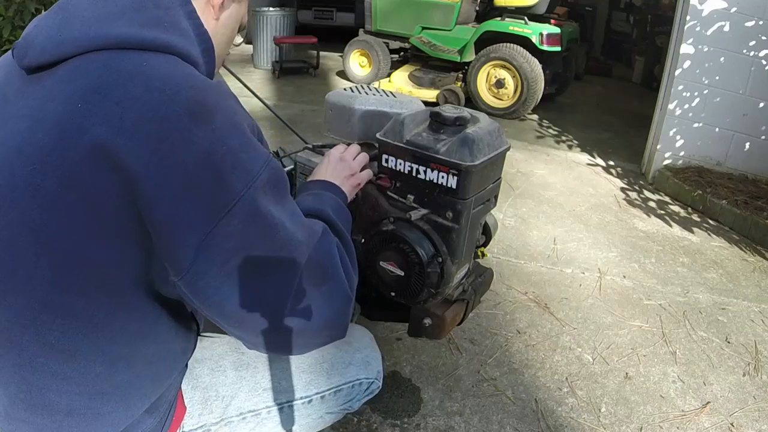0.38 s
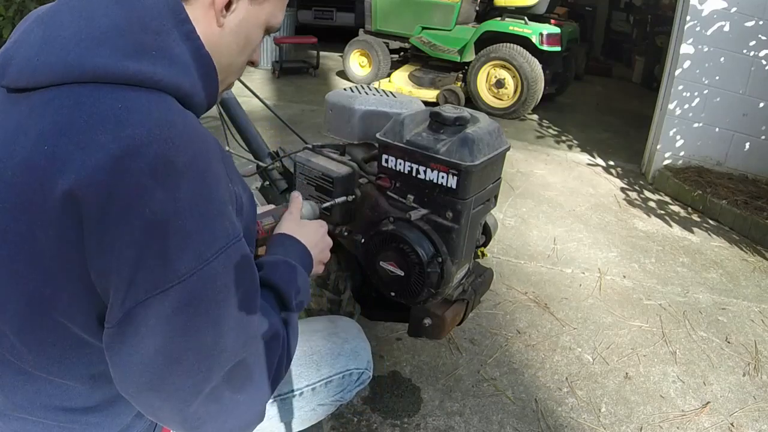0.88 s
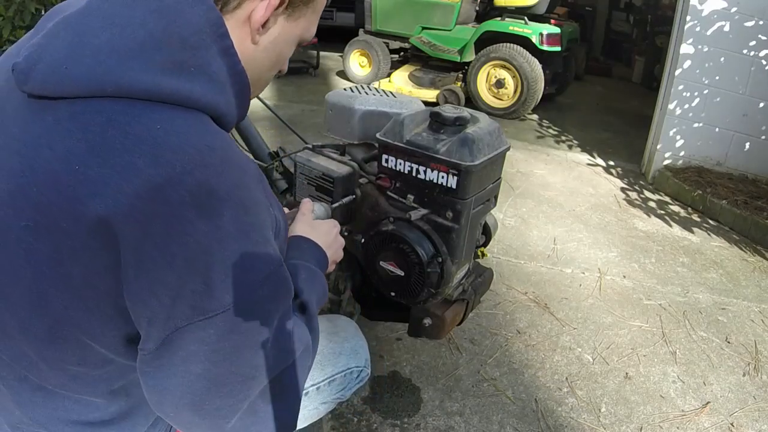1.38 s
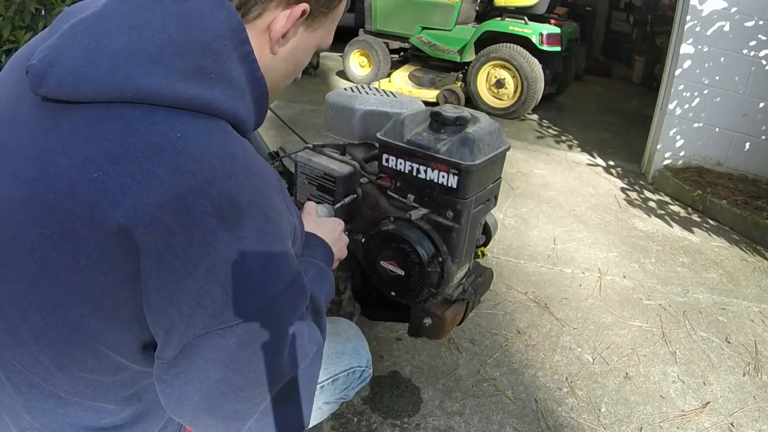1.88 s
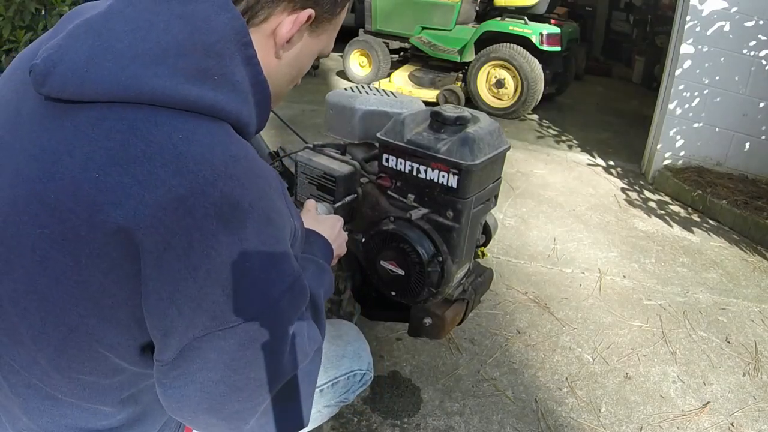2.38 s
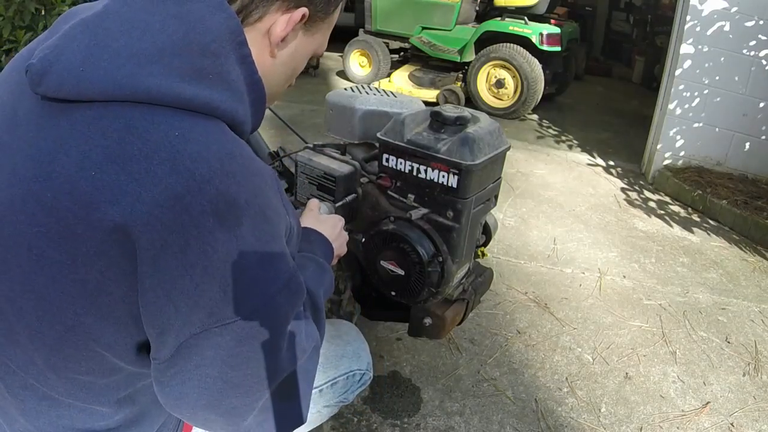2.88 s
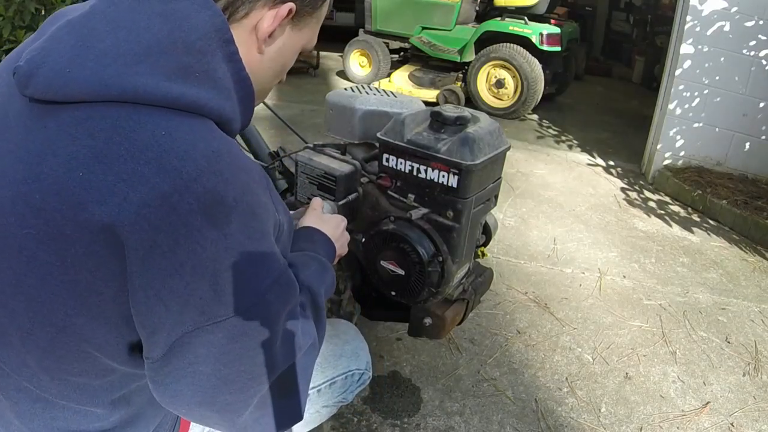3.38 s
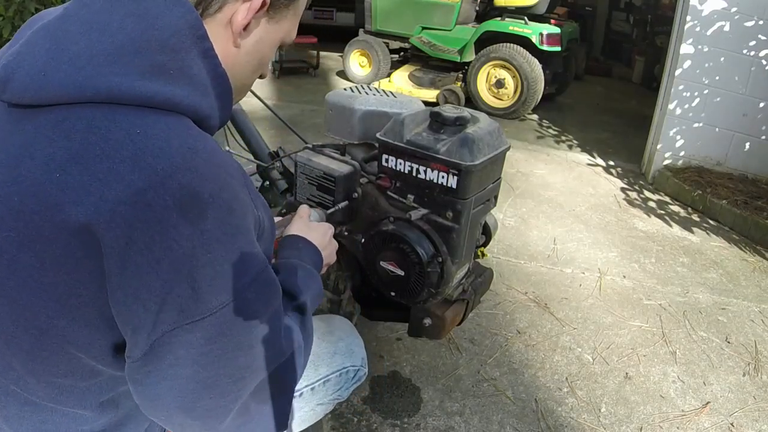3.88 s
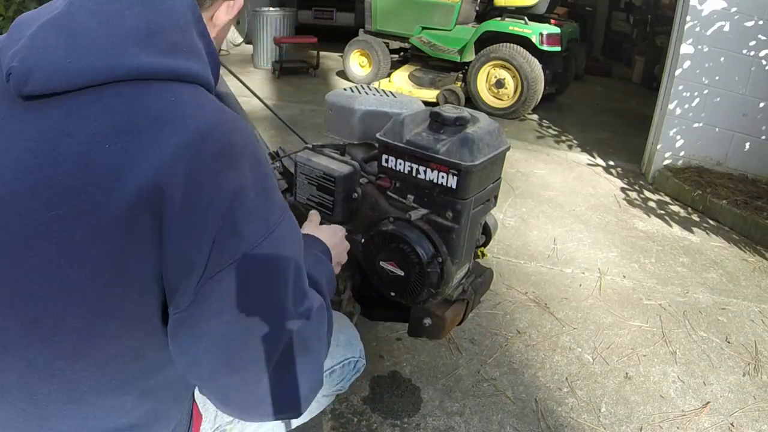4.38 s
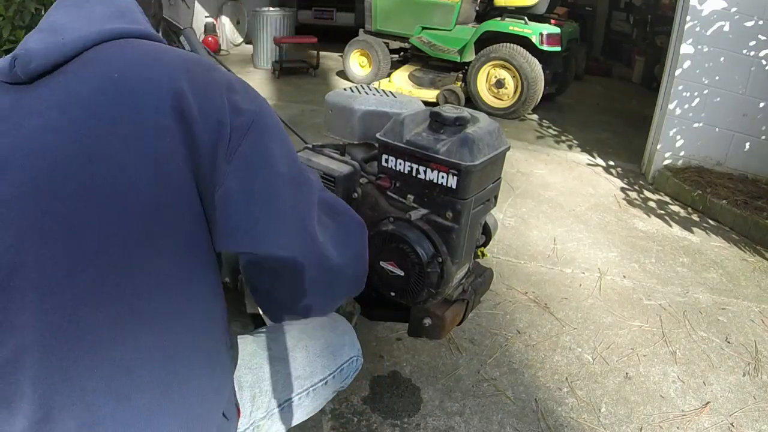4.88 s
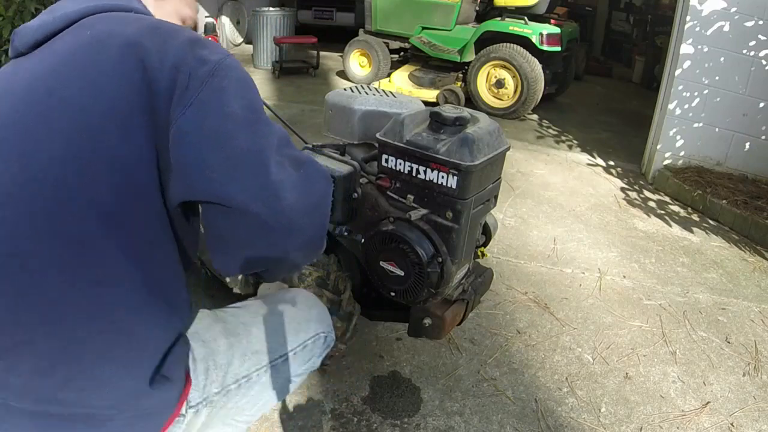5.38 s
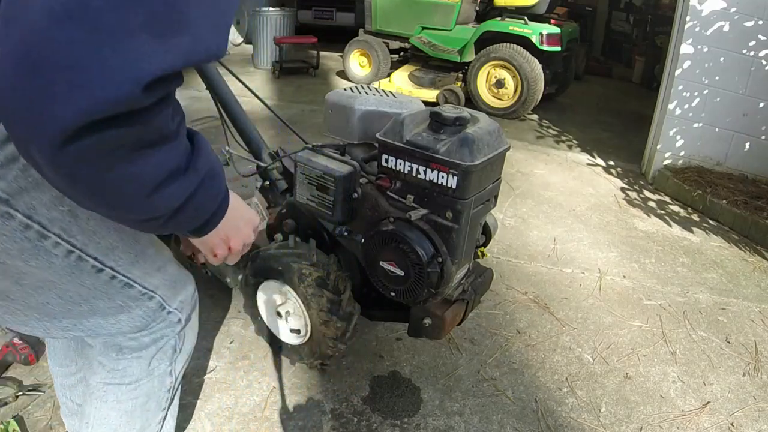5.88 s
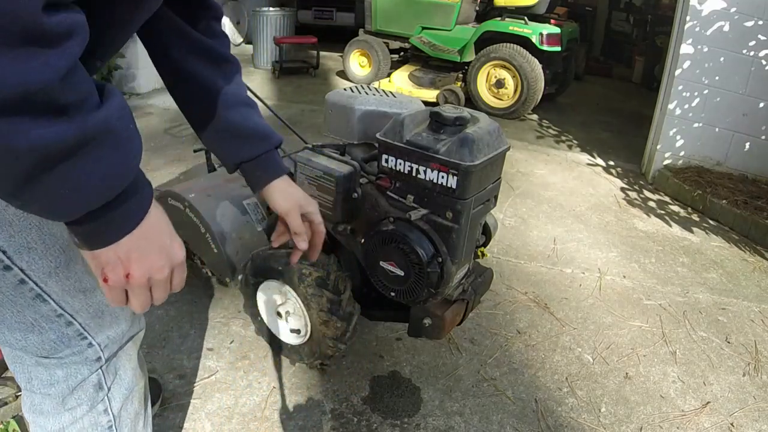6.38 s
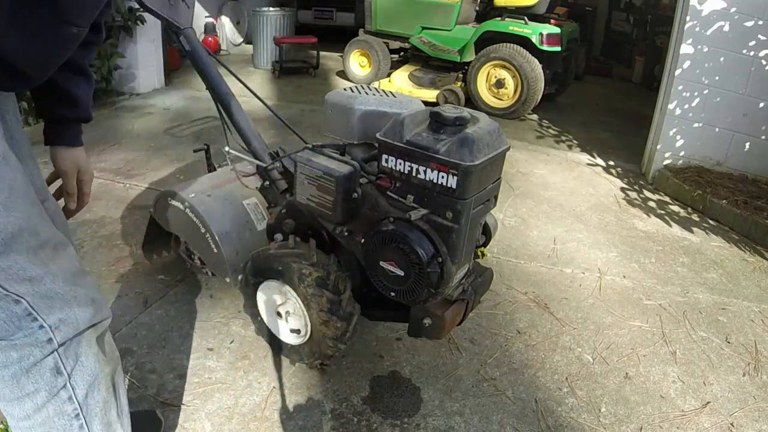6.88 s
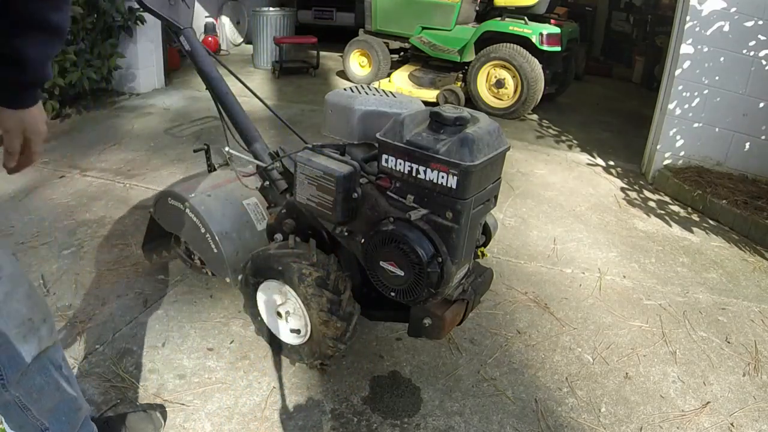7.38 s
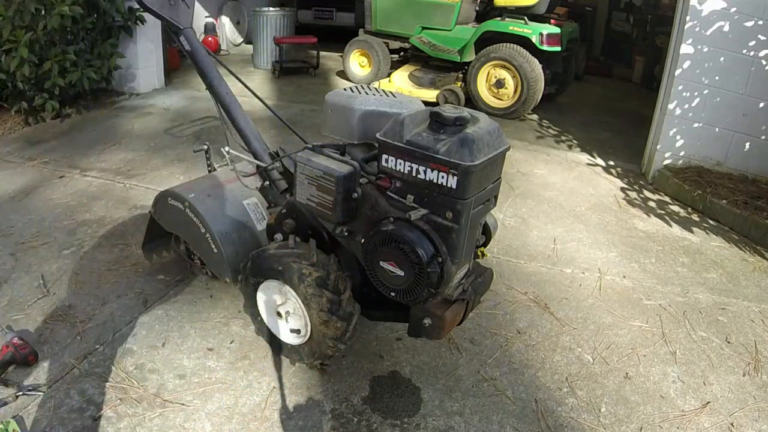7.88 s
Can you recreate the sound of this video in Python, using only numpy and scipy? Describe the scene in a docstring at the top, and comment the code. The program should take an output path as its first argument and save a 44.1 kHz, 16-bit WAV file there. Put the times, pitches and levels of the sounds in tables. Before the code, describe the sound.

Close outdoor sound of power-tool work on an engine: a brief rattling hammer burst right at the start, scattered light taps of the bit, then a whining motor run ending in a louder, fast metallic burst. Afterwards it is quiet, with a faint clothing crackle, a clack as the tool is put down, small snaps and hissing scrapes. Thin bird calls and low traffic rumble surround it, with a short echo from nearby walls.

```python
"""In a yard before a barn door, a cordless impact driver tightens two screws on a small engine's cover.
Its motor whirs as gear noise and shaft harmonics; hammer blows and rebounds in pairs, and knocks of the bit,
crack as noise and ring the cover's modes. Set down, the tool snaps and rings its resonances.
Narrow bands of noise hiss as scrapes and stiff cloth ticks; the barn's walls answer in decaying noise.
Birds call as gliding tones over a far rumble of coloured noise with a faint whine."""
import sys
import numpy as np
from scipy import signal
from scipy.fft import rfft, irfft, next_fast_len
from scipy.io import wavfile
from scipy.ndimage import uniform_filter1d, map_coordinates

SR = 44100
rng = np.random.default_rng(int(sys.argv[2]) if len(sys.argv) > 2 else 0)


def invert_db(level):
    """Linear amplitude ratio for a level in decibels (20 dB per decade), elementwise."""
    return 10 ** (np.asarray(level, dtype=float) / 20)


def inscribe(sig):
    """Save sig as 16-bit PCM at rate SR to the path in sys.argv[1].

    A 1-D sig is mono; a 2-D sig holds one channel per row.
    Samples are clipped to [-1, 1] before scaling.
    """
    pcm = np.round(np.clip(np.atleast_2d(sig).T, -1, 1) * 32767)
    wavfile.write(sys.argv[1], SR, pcm.astype(np.int16))


N = 363825
TIME = np.arange(N) / SR

# Modes of the cover. Each row: frequency in Hz, 60 dB decay time in seconds, then relative level in dB
# at the first screw, at the second screw and under the loose bit.
COVER = [(121.3, 0.062, -7.5, -17.5, -2), (250, 0.071, -10.5, -0.5, -6), (275.4, 0.18, -27, -7, -13),
         (371, 0.089, 3.5, 1, 3.5), (436, 0.073, -1.5, -7, 6), (549.6, 0.042, -0.5, -2.5, -4),
         (662.4, 0.4, -17.5, -25, -21.5), (802.6, 0.33, -14, -25, -22), (944, 0.033, -4.5, -14, 3.5),
         (1084, 0.075, -5, -11.5, -10.5), (1394, 0.026, -11.5, -14, 5.5)]


def unit(x):
    """Normalisation: scales a signal to an rms of 1."""
    return x / np.sqrt(np.mean(x ** 2) + 1e-20)


def along(points, hz):
    """Interpolation on a logarithmic frequency axis, through (Hz, value) points."""
    point_hz, values = np.transpose(points)
    return np.interp(np.log(hz + 1), np.log(point_hz + 1), values)


def curves(rows):
    """Linear interpolation in time: one curve per column after the first, then a soft gate shut outside the rows."""
    s, *columns = np.transpose(rows)
    is_open = 1. * ((TIME >= s[0]) & (TIME <= s[-1]))
    gate = uniform_filter1d(is_open, size=300, mode="nearest")
    return [np.interp(TIME, s, column) for column in columns] + [gate]


def wobble(rate):
    """Slow random modulation: a smooth curve through `rate` random knots a second."""
    knots = rng.standard_normal(int(N * rate / SR) + 4)
    return map_coordinates(knots, [TIME * rate])


def filtered(x, response):
    """Linear filtering: multiplies the spectrum by a response of frequency."""
    size = next_fast_len(len(x) + 8192)
    spectrum = rfft(x, size) * response(np.fft.rfftfreq(size, 1 / SR))
    return irfft(spectrum, size)[:len(x)]


def noise(response):
    """Coloured noise: white noise shaped by a response, at an rms of 1."""
    return unit(filtered(rng.standard_normal(N), response))


def even(x):
    """Envelope flattening: irons out the chance swells of noise, so that like blows crack alike."""
    return x / np.sqrt(np.abs(uniform_filter1d(x ** 2, size=130)) + 1e-6)


def resonances(peaks):
    """Modal superposition: sums (Hz, width in Hz, dB) resonances, neighbours in opposite sign."""
    def response(f):
        total = 0
        for k, (centre, width, db) in enumerate(peaks):
            damping = 1j * f * width
            total = total + (-1) ** k * invert_db(db) * damping / (centre * centre - f * f + damping)
        return total
    return response


def tone(hz, rough_hz):
    """Frequency modulation: the phase is the integral of a fluttering pitch."""
    return 2 * np.pi * np.cumsum(hz + rough_hz * wobble(60)) / SR


def shaking(place):
    """Forced vibration: steady noise excites the cover's modes, as heard from one place on it."""
    modes = resonances([(row[0], 4.1 / row[1] + 8, row[2 + place]) for row in COVER])
    top_hz = 1800  # the shaking fades above this
    return noise(lambda f: modes(f) / (1 + (f / top_hz) ** 4))


def tool(low_db, high_db, spread_db):
    """Body resonance: modes of the tool and loose parts, randomly varied and tipped towards low or high."""
    # Each row: frequency in Hz, width in Hz, level in dB before the random spread.
    body_modes = [(220, 240, 1.5), (484, 210, 6.5), (950, 290, 7), (1354, 290, 8.5), (1960, 320, -1),
                  (2516, 280, 2.5), (3200, 520, 0), (5110, 490, 3.5), (5940, 830, 2.5), (9100, 3500, -9.5)]
    rings = resonances([(hz, width, db + rng.normal(0, spread_db)) for hz, width, db in body_modes])
    tilt = [(1450, low_db), (1900, 0), (4000, 0), (4800, high_db)]
    return lambda f: rings(f) * invert_db(along(tilt, f))


def hammer():
    """Impact excitation: blows, rebounds and knocks ring the cover's modes, with a crack and a loose rattle."""
    # Hammer strokes. Each row: time in seconds, strength in dB.
    blows = [(0.1272, -14), (.1645, -13), (.2, -13), (0.2377, -13.5), (0.2786, -14.5), (3.4883, -9),
             (3.5259, -6.5), (3.5609, -7.5), (3.5926, -8), (3.6252, -6), (3.6607, -9)]
    # Lighter knocks of the bit on the cover. Each row: time in seconds, crack strength in dB,
    # thump in dB relative to the crack.
    knocks = [(0.1198, -29.5, 5), (1.0115, -30, -10.5), (1.056, -32, -5), (1.086, -53, 9.5),
              (1.0934, -33.5, -5), (1.2128, -53.5, 10), (1.379, -34, -9), (1.3875, -23.5, -16),
              (1.4785, -38.5, -4), (1.5736, -29, -6.5), (2.2753, -28.5, -28), (3.0091, -37.5, 5.5),
              (3.0454, -32.5, 4.5), (3.48, -18.5, -7.5), (3.6819, -20.5, -3.5), (3.7064, -38, 17)]
    # Each screw's seat. Each row: first flight to the rebound in seconds, then levels in dB against the
    # stroke's strength: the blow's crack, the blow's thump, dragging steel, the cover shaken by the dragging.
    seats = [(.0092, -3.5, -7, -21.5, -12.5), (0.00728, 0, -5.5, -28.5, -18)]
    # Steel on steel. Each row: frequency in Hz, relative noise density in dB.
    anvil = [(470, -35.5), (800, -3.5), (1080, -7), (3020, -3.5), (4290, -15.5), (6740, -7), (7930, -22.5),
             (8990, -14.5), (15500, -28.5)]
    rebound_thump_db = -14  # the rebound is mostly crack
    flight_shrinks = .96  # each flight over the one before, as the screw tightens
    cock_s, cock_db = 0.00643, -15.5  # the hammer ticks over its cam just before a blow
    drag_lead_s, drag_lag_s = 0.0034, 0.037  # the hammer drags from before the first blow to after the last
    soft_db_per_octave = .5  # a duller knock reaches the upper modes less: loss for each dB of thump
    low_cut_hz = 205  # low cut on the ring of all but the lowest mode

    hits, drag, rumble = list(knocks), 0, 0
    for screw, (flight, crack_db, thump_db, drag_db, shake_db) in enumerate(seats):
        strokes = [row for row in blows if (row[0] > 1) == screw]
        hits += [(s, db + crack_db, thump_db - crack_db) for s, db in strokes]
        hits += [(s - cock_s, db + cock_db, rebound_thump_db) for s, db in strokes[1:]]
        hits += [(s + flight * flight_shrinks ** k, db, rebound_thump_db)
                 for k, (s, db) in enumerate(strokes)]
        gate, = curves([(strokes[0][0] - drag_lead_s,), (strokes[-1][0] + drag_lag_s,)])
        effort = gate * invert_db(np.mean(strokes, axis=0)[1])
        drag = drag + effort * invert_db(drag_db + 3.6 * wobble(200))
        rumble = rumble + effort * invert_db(shake_db) * shaking(screw)

    lowest, ring, steel_burst, dull_burst = np.zeros((4, N + SR))
    t = np.arange(SR // 2) / SR
    hz, t60, *levels = np.transpose(COVER)[:, :, None]
    sides = (-1) ** np.arange(len(COVER))[:, None]  # neighbouring modes start in opposite directions
    ring_rise = 1 - np.exp(-t / 0.0011)
    crack = invert_db(-60 * t / 0.012)
    rattle = invert_db(-11.0 - 60 * t / 0.047)
    crack_shape = (1 - np.exp(-t / 0.00035)) * (crack + rattle)
    for s, db, thump_db in hits:
        place = 0 if s < 1 else 1 if 2.5 < s < 4 else 2  # first screw, second screw, loose bit
        loose = place == 2
        octaves_up = np.log2(np.maximum(hz / 450, 1))
        soft_db = loose * soft_db_per_octave * max(thump_db + 8, 0) * octaves_up
        mode_db = levels[place] - soft_db + rng.normal(0, 3.33, hz.shape)
        sizes = sides * invert_db(mode_db - 60 * t / t60) * ring_rise
        waves = invert_db(db + thump_db) * sizes * np.sin(2 * np.pi * hz * t)
        span = slice(round(s * SR), round(s * SR) + len(t))
        lowest[span] += waves[0]
        ring[span] += waves[1:].sum(0)
        burst = dull_burst if loose else steel_burst
        burst[span] += invert_db(db - 6.5) * crack_shape

    steel = even(noise(lambda f: invert_db(along(anvil, f))))
    dull = even(noise(tool(low_db=-7.5, high_db=-12.5, spread_db=0)))  # a loose bit sets off the tool's body
    upper = filtered(ring[:N] + rumble, lambda f: f ** 8 / (f ** 8 + low_cut_hz ** 8))
    cracks = (steel_burst[:N] + drag) * steel + dull_burst[:N] * dull
    return lowest[:N] + upper + cracks


def motor():
    """Rotating machinery: shaft speed sets harmonics and gear whine, effort their levels; the speed control sings."""
    # Two runs of the motor. Each row: time in seconds, shaft rate in Hz, effort in dB.
    runs = [
        [(0, 250, -58.5), (.12, 255, -57)],
        [(2.27, 160, -65), (2.38, 191, -61.5), (2.52, 228, -58.5), (2.6, 245, -62.5), (2.7, 205, -67),
         (2.77, 212, -58), (2.83, 218, -57), (2.97, 250, -55.5), (3.48, 257, -55.5)],
    ]
    # Shaft orders. Each row: multiple of the shaft rate, relative level in dB.
    shaft_orders = [(2, -3), (3, 3), (4, -8), (14.5, -12.5)]
    # Colour of the gear noise as heard. Each row: frequency in Hz, relative noise density in dB.
    gear_noise = [(530, -6.5), (900, -1.5), (2700, -8), (3000, -1), (3250, -8), (3800, -15), (4330, -22.5),
                  (5370, -14), (7860, -27.5), (9290, -25), (11500, -32), (13000, -25.5), (15500, -48.5)]
    # Speed-control tone while the trigger is held. Each row: start in seconds, end in seconds, level in dB.
    trigger = [(2.27, 2.57, -60.5), (2.65, 3.47, -63.5)]
    # Its harmonics. Each row: multiple of the tone, relative level in dB.
    switch_orders = [(1, 0), (2, -8), (3, -7), (5, -15)]
    switch_hz = 1840
    full_effort_db = -55
    orders_over_db, orders_grow = 8.5, 2.0  # over the effort; further gain for each dB of effort
    brightens, bright_hz = 0.88, 6000  # gear treble gained for each dB of effort, above this
    mesh_teeth, mesh_under_db = 21.8, -14  # gear whine: multiple of the shaft, level against the effort
    loose_db, seated_s, seated_db = 6.5, 2.94, 10  # the cover shakes more once the bit has seated
    jolt_s, jolt_width_s, jolt_db = 3.055, 0.063, 9.5  # the bit judders as the thread bites

    gears = noise(lambda f: invert_db(along(gear_noise, f)))
    treble = filtered(gears, lambda f: 1 / (1 + (bright_hz / (f + 1)) ** 4))
    jolt = np.exp(-((TIME - jolt_s) / jolt_width_s) ** 2)
    contact_db = np.where(TIME > seated_s, seated_db, loose_db) + jolt_db * jolt
    shake = invert_db(uniform_filter1d(contact_db, size=900) + 2.1 * wobble(35)) * shaking(1)
    out = np.zeros(N)
    for rows in runs:
        hz, db, gate = curves(rows)
        extra_db = db - full_effort_db
        whine = invert_db(mesh_under_db + 3 * wobble(41)) * np.sin(tone(mesh_teeth * hz, rough_hz=40))
        turn = tone(hz, rough_hz=1.5)
        orders = sum(invert_db(level + 2 * wobble(13)) * np.sin(k * turn) for k, level in shaft_orders)
        orders = invert_db(orders_over_db + orders_grow * extra_db) * orders
        bright_gears = gears + (invert_db(brightens * extra_db + 5.0) - 1) * treble
        grind = invert_db(8.5 + 1.3 * wobble(90)) * bright_gears
        out += gate * invert_db(db) * (grind + shake + whine + orders)
    beat = tone(switch_hz, rough_hz=1.6)
    held = sum(invert_db(db) * curves([(on,), (off,)])[0] for on, off, db in trigger)
    song = sum(invert_db(level + 2.6 * wobble(25)) * np.sin(k * beat) for k, level in switch_orders)
    return out + held * song


def clicks():
    """Transient excitation: snaps with settling grit ring the tool and loose parts, each in its own balance."""
    # Small clicks, snaps and grit. Each row: time in seconds, level in dB before the balance,
    # balance in dB of the low end (below about 1.8 kHz) and of the high end (above about 5 kHz).
    snaps = [(5.274, -31, -2, -13.5), (5.309, -41.5, 2, -8), (6.786, -34, -5.5, -10), (7.378, -55, 8, -8),
             (5.393, -43, 0.5, -14), (5.2598, -17, -3.5, -16), (5.2812, -23.5, -12, -16),
             (5.4495, -41, -1.5, -4.5), (5.5216, -44.5, -8, -7), (5.5728, -48.5, -15, -9),
             (5.8484, -43.5, -22, -4.5), (6.449, -48.5, 10.5, -34), (6.707, -27, -4.5, -7.5),
             (6.779, -32.5, -3.5, -9), (7.2662, -45.5, -6, -6), (7.4124, -42, -20, -18),
             (7.46, -42.5, -10, -13),  (7.5372, -33, -16, -24)]
    out, t = np.zeros(N + SR), np.arange(SR // 4) / SR
    for s, db, low_db, high_db in snaps:
        snap = invert_db(-60 * t / 0.014)
        grit = invert_db(-15 - 60 * t / 0.14 + 4.9 * wobble(153)[:len(t)])
        source = (snap + grit) * rng.standard_normal(len(t))
        puff = filtered(source, tool(low_db, high_db, spread_db=2))
        size = np.sqrt(1 + invert_db(2 * low_db) + invert_db(2 * high_db))
        out[round(s * SR):][:len(t)] += invert_db(db + 2.5) * size * puff / np.abs(puff).max()
    return out[:N]


def scrapes():
    """Sliding band noise: narrow hissing scrapes, the first after the tool is set down, fainter and lower at their ends."""
    # Each row: start, loudest moment and end in seconds, then centre in Hz and level in dB when loudest.
    hisses = [(5.285, 5.3, 5.6, 2950, -59.5), (6.998, 7.537, 7.68, 3270, -58.5),
              (8.044, 8.238, 8.4, 3830, -63)]
    edge_db, slide = -12, 0.14  # level change and share of the centre frequency lost at the ends
    centres = np.array([2600, 3100, 3600, 4100])  # Hz
    bands = np.array([noise(resonances([(c, 350, 0)])) for c in centres])
    out = np.zeros(N)
    for start, loudest, end, hz, db in hisses:
        edge, gate = curves([(start, 1), (loudest, 0), (end, 1)])
        centre_hz = hz * (1 - slide * edge)
        share = np.exp(-((centre_hz - centres[:, None]) / 400) ** 2)
        level = invert_db(db + edge_db * edge + 2.1 * wobble(150))
        out += gate * level * (share * bands).sum(0)
    return out


def rustle():
    """Sparse random impulses: stiff cloth crackles in scattered tiny ticks, mostly treble."""
    # Each row: start in seconds, end in seconds, level of the faintest ticks in dB.
    crackles = [(4.186, 4.66, -63.5)]
    ticks = np.zeros(N)
    for start, end, db in crackles:
        when, size = rng.random((14, 2)).T
        ticks[((start + when * (end - start)) * SR).astype(int)] = invert_db(db + 10 * size)
    envelope = signal.fftconvolve(ticks, invert_db(-60 * TIME[:2000] / 0.027))[:N]
    return envelope * noise(lambda f: np.exp(-np.log((f + 1) / 6500) ** 2 / 0.34))


def barn(x):
    """Reverberation: the walls' answer is noise in which each frequency dies at its own speed."""
    # Each row: frequency in Hz, 60 dB decay time in seconds.
    decay = [(400, 0.48), (800, 0.58), (3000, 0.43), (12000, 0.16)]
    hz, t, z = signal.stft(rng.standard_normal(SR), SR, nperseg=256)
    fade = invert_db(-60 * t / along(decay, hz)[:, None])
    tail = signal.istft(z * fade, SR, nperseg=256)[1]
    delayed = np.pad(x, (600, 0))  # samples
    return signal.fftconvolve(delayed, tail / np.linalg.norm(tail))[:N]


def birds():
    """Gliding near-pure tones: a thin high call and a lower warble, both with fluttering pitch and level."""
    # Shape of the high call. Each row: time from its start in seconds, pitch in Hz, relative level in dB.
    high_call = [(0, 9200, -8), (.012, 8100, -9), (.05, 7720, 0), (.127, 7750, -6), (.132, 7800, -30),
                 (.165, 9800, -30), (.17, 9300, -1), (.186, 7200, -2)]
    # The high bird. Each row: start in seconds, level in dB.
    high_bird = [(.82, -71), (4.092, -69.5), (5.487, -68)]
    # The low bird. Each row: start in seconds, length in seconds, pitch at the start in Hz, mid-note level in dB.
    low_bird = [(5.91, .21, 2780, -68), (6.96, .1, 2530, -57), (7.23, .065, 2440, -62),
                (7.305, .1, 2380, -65)]
    note_arch, note_swell_db = .035, 6  # each note arches, sags and swells towards its middle
    out = np.zeros(N)
    for start, call_db in high_bird:
        hz, db, gate = curves(np.add(high_call, [start, 0, call_db]))
        out += gate * invert_db(db + 3.6 * wobble(50)) * np.sin(tone(hz, rough_hz=24.8))
    for start, length, hz, db in low_bird:
        part, gate = curves([(start, 0), (start + length, 1)])
        arch = np.sin(np.pi * part)
        note_hz = hz * (1 + note_arch * (arch - part))
        level = invert_db(db + note_swell_db * (arch - 1) + 4 * wobble(45))
        out += gate * level * np.sin(tone(note_hz, rough_hz=12))
    return out


def yard():
    """Broadband ambience: far traffic rumble and air, drifting a little, with a faint whine."""
    # Each row: frequency in Hz, relative noise density in dB.
    colour = [(20, -12), (70, -1), (157, -11.5), (191, -8.5), (439, -19), (811, -18.5), (2470, -30.5),
              (7950, -43), (15500, -55.5)]
    # A far whine that comes and goes: frequency in Hz, level in dB.
    hum = (1343, -68)
    hum_hz, hum_db = hum
    air = invert_db(-50 + 1.1 * wobble(1.5)) * noise(lambda f: invert_db(along(colour, f)))
    whine = invert_db(hum_db + 1.8 * wobble(1)) * np.sin(tone(hum_hz, rough_hz=6.4))
    return air + whine


def scene():
    """Superposition: near sources with the barn's answer, over birds and yard."""
    near = hammer() + motor() + clicks() + scrapes() + rustle()
    return (near + invert_db(-16.0) * barn(near) + birds() + yard())[None]


def band_limit(x):
    """A steep low-pass at the top of the band."""
    return signal.sosfilt(signal.butter(12, 16520, fs=SR, output="sos"), x)


def record(dry):
    """Signal chain: the finished mix goes through the last stage."""
    return band_limit(dry)


dry = scene()
out = record(dry)
inscribe(out)
```